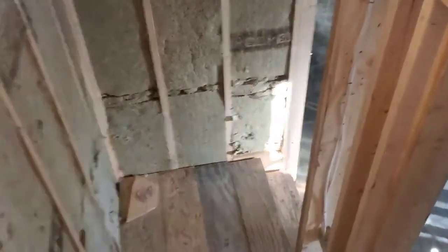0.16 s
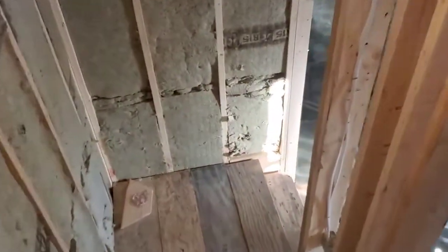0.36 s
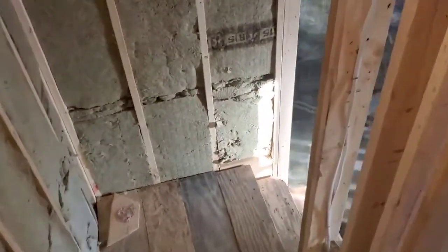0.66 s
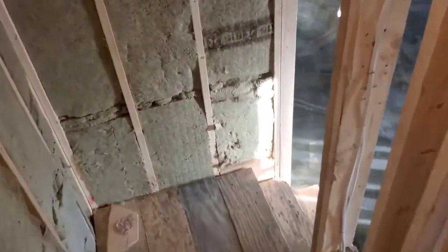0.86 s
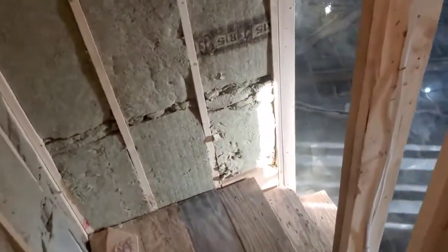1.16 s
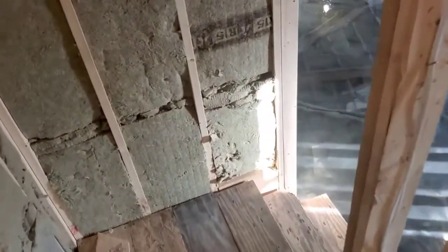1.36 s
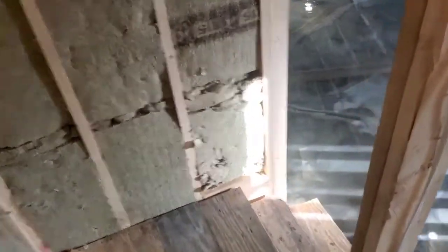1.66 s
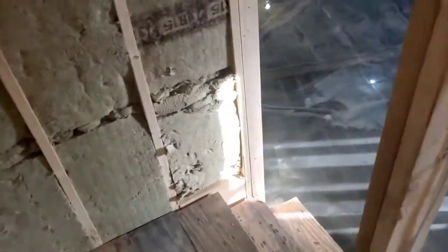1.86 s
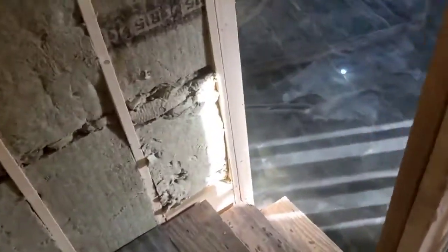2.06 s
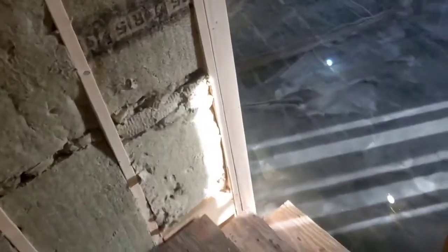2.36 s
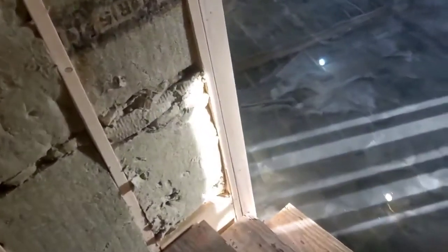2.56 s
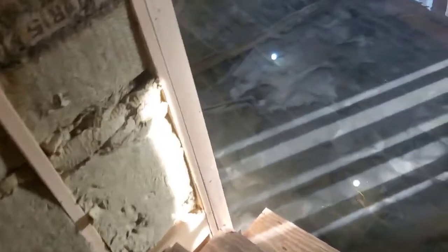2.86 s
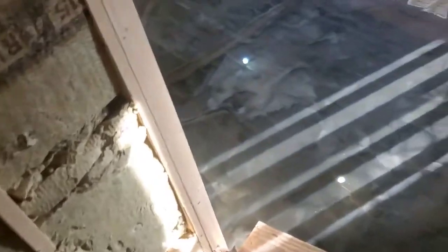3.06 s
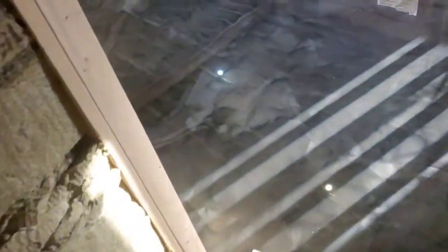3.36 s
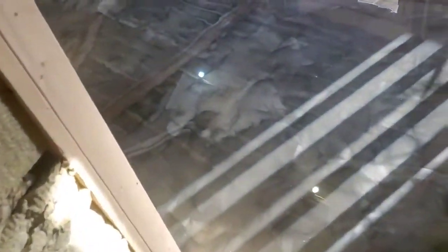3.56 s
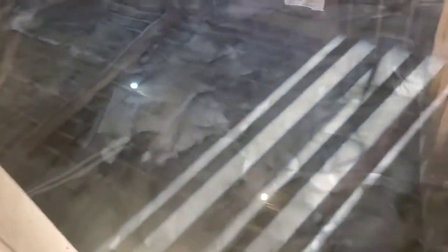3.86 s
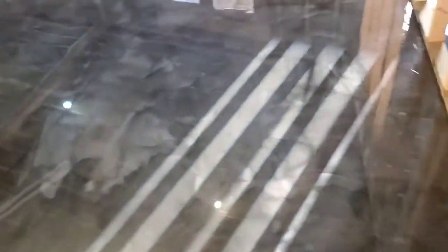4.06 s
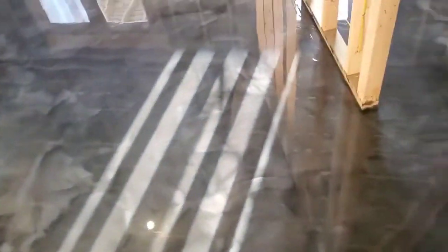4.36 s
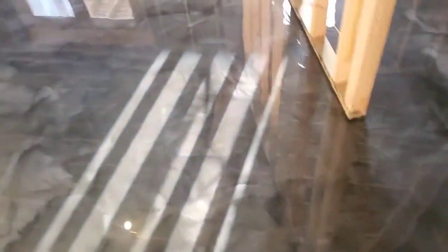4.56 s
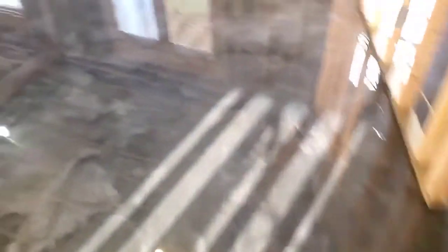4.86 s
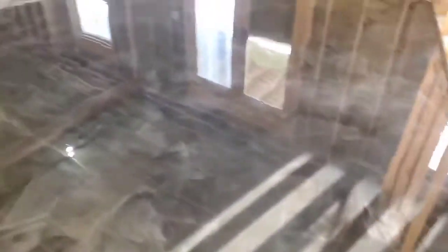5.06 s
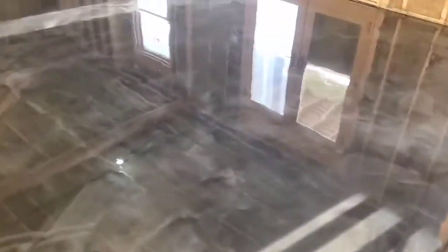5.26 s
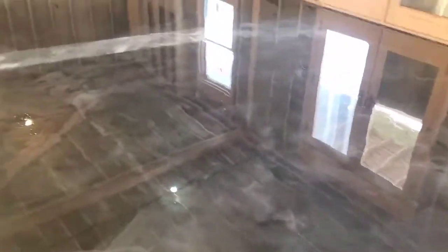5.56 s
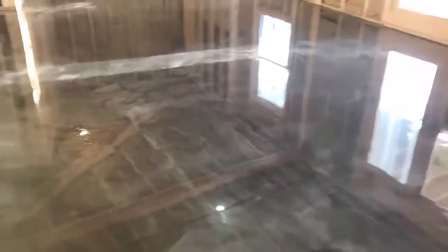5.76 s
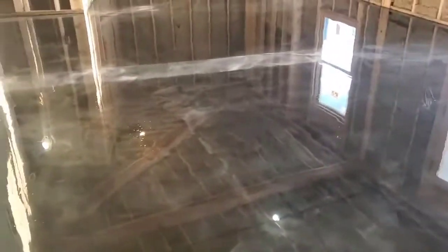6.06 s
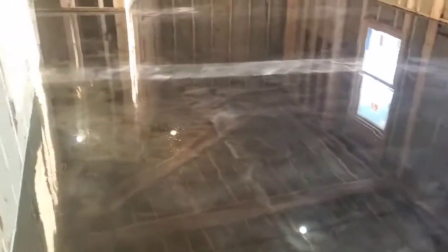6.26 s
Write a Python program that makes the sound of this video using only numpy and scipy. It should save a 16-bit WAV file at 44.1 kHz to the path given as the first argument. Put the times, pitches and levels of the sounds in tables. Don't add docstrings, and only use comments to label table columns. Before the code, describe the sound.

Close footsteps descend rough wooden stairs in an unfinished house. Soles crunch loose grit, clack on tread edges and make planks ring, with low thumps from the framing. The loudest crunchy cluster comes about two and a half seconds in; later steps are duller, and a hard heel lands on the slab at five seconds. Cloth rustles near the handheld stereo microphone, with a short dull room tail and very faint hum.

```python
import sys
import numpy as np
from scipy import signal
from scipy.fft import rfft, irfft, next_fast_len
from scipy.io import wavfile
from scipy.ndimage import uniform_filter1d

SR = 44100
rng = np.random.default_rng(int(sys.argv[2]) if len(sys.argv) > 2 else 0)


def bounce(signal):
    frames = np.transpose(np.atleast_2d(signal))
    limited = np.clip(frames, -1, 1)
    pcm = np.round(limited * 32767).astype(np.int16)
    wavfile.write(sys.argv[1], SR, pcm)


def gain_from_db(level_db):
    decades = np.asarray(level_db, float) / 20
    return 10 ** decades


N = 282681
SIZE = next_fast_len(N + SR)
RISE_SHARE = 0.012

# start_s, peak_db, t60_s, ring_hz
CRACKS = [(0.002, -32.5, 0.044, 1500), (0.849, -26.5, 0.1, 1620), (0.895, -36.5, 0.05, 1930),
          (2.2, -45.5, 0.085, 1000), (2.449, -37, 0.2, 1550), (2.493, -20.5, 0.051, 2130),
          (2.619, -35, 0.044, 2080), (3.078, -34.5, 0.031, 1360), (3.439, -49.5, 0.036, 1750),
          (4.843, -54.5, 0.079, 2030), (4.973, -46.5, 0.032, 1040), (5.179, -50, 0.074, 1710)]
# start_s, peak_db, t60_s, ring_hz
PRESSES = [(0.356, -50.5, 0.17, 1310), (0.441, -35, 0.072, 1350), (0.513, -53.5, 0.44, 1560),
           (0.562, -30, 0.076, 1150), (0.739, -53.5, 0.11, 1260), (0.993, -46, 0.24, 1710),
           (1.484, -46, 0.11, 2040), (2.015, -38.5, 0.049, 1480), (2.459, -33.5, 0.17, 2240),
           (2.476, -30, 0.076, 1620), (2.885, -46, 0.067, 2250), (2.947, -44.5, 0.17, 1780),
           (3.318, -53, 0.31, 2160), (4.115, -52.5, 0.15, 2200), (5.67, -54, 0.25, 1330),
           (5.704, -46, 0.3, 1680)]
# start_s, peak_db, t60_s, ring_hz, relative wood_db
TAPS = [(0.091, -42.5, 0.15, 1300, -3.5), (0.451, -42.5, 0.09, 1350, -26), (0.839, -37, 0.11, 1380, -2),
        (0.945, -36.5, 0.067, 1370, -8), (1.406, -37, 0.12, 1010, -4.5), (1.907, -34.5, 0.11, 1020, -19),
        (1.952, -41, 0.17, 1520, -8), (2.093, -49, 0.13, 1010, 2.5), (2.466, -28, 0.088, 2050, -37),
        (2.505, -28, 0.035, 1130, 1), (2.612, -37.5, 0.1, 1920, -8), (2.912, -38.5, 0.1, 1450, -13),
        (3.143, -47.5, 0.091, 980, -12)]
# start_s, peak_db, t60_s, relative wood_db, relative fizz_db
BUMPS = [(0.275, -69.5, 0.11, 18.5, -24), (0.41, -56.5, 0.23, 5, 0.5), (0.88, -54, 0.057, 8, 2),
         (0.909, -56.5, 0.15, 10, -0.5), (1.435, -49, 0.25, 5, -12.5), (1.887, -49.5, 0.12, 8, -11),
         (2.438, -44, 0.18, 0, -3), (2.86, -52.5, 0.095, 11, -32), (3.482, -48, 0.041, 5, -19),
         (3.507, -48, 0.036, 6, -4), (3.556, -50, 0.06, 4, -18), (3.586, -43.5, 0.04, 0.5, -18),
         (3.624, -43, 0.06, 8.5, -7), (3.661, -51.5, 0.055, 13, -6), (4.24, -79, 0.21, 18.5, -20),
         (4.36, -66.5, 0.021, 20.5, -15), (5.025, -49.5, 0.13, 15, -40)]


def contacts():
    cracks = [(s, db, -13, -13.5, t60, hz) for s, db, t60, hz in CRACKS]
    presses = [(s, db, -4, -14, t60, hz) for s, db, t60, hz in PRESSES]
    taps = [(s, db, wood_db, -31, t60, hz) for s, db, t60, hz, wood_db in TAPS]
    bumps = [(s, db, wood_db, fizz_db, t60, 1350) for s, db, t60, wood_db, fizz_db in BUMPS]
    return cracks + presses + taps + bumps


# pitch_hz, level_db per Hz
CRUNCH = [(290, -36.5), (500, -9), (612, 1), (757, -7.5), (1020, -9), (1160, -4.5), (1600, -7), (1820, -6),
          (2080, -3.5), (3030, -18.5), (5000, -37), (6500, -69), (11000, -120)]


def crunch():
    out, stones = np.zeros((2, N)), colour(grit(1800, 2.2, 0.6), CRUNCH)
    for s, db, _, _, t60, hz in contacts():
        shape = swell(0.72 * RISE_SHARE * t60, t60)[1]
        burst = stones[:, round(s * SR):][:, :len(shape)]
        burst = burst * shape[:burst.shape[1]]
        ring = min(1, (1500 / hz) ** 2) * resonate(burst, hz, 230)
        add(out, s, gain_from_db(db - 9.5) * (burst + 1.55 * ring))
    return out


# pitch_hz, width_hz, level_db
WOOD = [(179, 190, -4.5), (284, 98, 0), (385, 51, 0), (452, 100, -1.5), (595, 87, -4), (765, 61, -10)]


def plank():
    effort = np.zeros(N)
    for s, db, wood_db, _, t60, _ in contacts():
        add(effort, s, gain_from_db(db + wood_db + 0.5) * swell(RISE_SHARE * t60, 1.59 * t60)[1])
    shake = grit(700, 3.6, 0.66) * effort
    out = np.zeros((2, N))
    for k, (hz, width, db) in enumerate(WOOD):
        out += (-1) ** k * gain_from_db(db) * resonate(shake, hz, width)
    return gain_from_db(13.0) * out


# pitch_hz, level_db per Hz
FIZZ = [(1760, 4), (3000, 5.5), (3750, 2), (3890, 2.5), (6040, 0), (7100, 1), (9070, -12.5), (10400, -5),
        (14300, -2), (15200, 0), (16000, -7)]


def fizz():
    effort = np.zeros(N)
    for s, db, _, fizz_db, t60, _ in contacts():
        add(effort, s, gain_from_db(db + fizz_db - 1.0) * swell(2.16 * RISE_SHARE * t60, 1.09 * t60)[1])
    bright = colour(grit(6000, 3.2, .9) * effort, FIZZ)
    dull = signal.sosfilt(signal.butter(4, 11800, fs=SR, output="sos"), bright)
    last_treads_s = 3.4
    return np.where(np.arange(N) < last_treads_s * SR, bright, dull)


# start_s, peak_db, ring_hz
SAND = [(0.3677, -56, 10100), (0.4278, -49, 12550), (0.4388, -39, 13440), (0.443, -55, 12900),
        (0.448, -40, 12730), (0.5625, -45, 13500), (0.8513, -39, 12700), (0.8817, -38, 13000),
        (0.8884, -47, 13050), (0.8971, -40, 12900), (0.9093, -54, 11800), (1.4088, -55.5, 12100),
        (1.8978, -56, 12600), (1.9095, -42, 14100), (1.927, -54, 12730), (1.9961, -50, 13140),
        (2.0013, -51, 13180), (2.0418, -47, 12620), (2.4411, -47, 13290), (2.45, -34, 15070),
        (2.4598, -29, 15000), (2.4681, -30, 14100), (2.4756, -28, 14900), (2.4926, -40, 13950),
        (2.5029, -35, 14100), (2.5251, -56, 9630), (2.6185, -36.5, 14560), (2.8877, -54, 13500),
        (2.9252, -56, 13180), (2.9489, -43, 15330), (2.9765, -50, 14250), (3.079, -45, 12210),
        (3.1074, -61, 12360), (3.3229, -55, 13760), (3.4408, -55, 13980), (3.5089, -51, 13100),
        (3.6261, -54, 11370), (3.6645, -55, 10060), (4.136, -52, 14450), (4.1686, -58, 12020),
        (4.8466, -59, 10210), (4.9729, -52, 12020)]
# start_s, peak_db, ring_hz
STONES = [(0.5665, -40, 3260), (0.575, -43, 3210), (0.8503, -47, 3010), (0.8809, -50, 6720),
          (0.8965, -53, 6600), (0.9096, -54, 4540), (0.9707, -55, 6850), (1.4112, -55, 3270),
          (1.909, -50, 6800), (2.0176, -59, 6870), (2.4497, -46, 4390), (2.4625, -37, 6700),
          (2.514, -40, 3320), (2.6188, -45.5, 7600), (2.8895, -54, 3010), (2.9053, -55, 4390),
          (2.9504, -56, 7580), (2.9773, -51, 3080), (3.08, -47, 3680), (3.4815, -68, 3190),
          (3.5089, -47, 5700), (3.5593, -59, 3980), (3.5719, -63, 3900), (3.6279, -50, 6000),
          (3.6651, -51.5, 3170), (4.1197, -58, 3810), (4.9729, -57, 4730), (5.177, -64, 7040)]
# start_s, peak_db, ring_hz
CLACKS = [(0.0157, -52, 820), (0.0989, -42, 1240), (0.4452, -37, 1460), (0.4508, -29.5, 1310),
          (0.4571, -48, 1310), (0.4671, -39, 1380), (0.5137, -52, 820), (0.5665, -44, 1210),
          (0.5771, -35, 2000), (0.8404, -40, 1390), (0.8501, -20.5, 1400), (0.854, -23, 1480),
          (0.884, -49, 1490), (0.8972, -32, 2000), (0.9493, -49, 1340), (1.4071, -41, 1070),
          (1.4379, -41.5, 1260), (1.444, -45, 870), (1.9102, -33.5, 1600), (1.9181, -41, 1710),
          (1.9561, -42, 1420), (2.0175, -38, 1510), (2.4602, -36, 830), (2.4685, -32, 1990),
          (2.4787, -29, 1550), (2.4991, -22, 1600), (2.5057, -20.5, 2000), (2.5152, -29.5, 1220),
          (2.5279, -44, 1380), (2.6158, -36, 2020), (2.6207, -29.5, 2040), (2.6298, -38, 1310),
          (2.9177, -41, 1580), (2.9461, -47, 1810), (2.9602, -45, 1380), (3.0796, -43.5, 1540),
          (3.1464, -49, 1020), (3.4411, -49.5, 2300), (3.4821, -48, 1320), (3.6259, -37.5, 1790),
          (5.7129, -45, 1560), (5.7413, -47, 1770)]
# start_s, peak_db, ring_hz
ROLLS = [(0.094, -40, 696), (0.86, -23.5, 614), (0.869, -29, 600), (0.911, -33, 600), (1.028, -45, 580),
         (1.41, -38, 1290), (1.487, -44, 614), (1.964, -40, 568), (2.023, -46, 1980), (2.446, -39, 538),
         (2.453, -30, 584), (2.4695, -22.5, 653), (2.494, -17, 2100), (2.509, -26, 595), (2.519, -36, 659),
         (2.863, -54, 533), (2.888, -45, 517), (2.924, -47, 528), (2.979, -38, 1320), (3.557, -47, 1380),
         (3.586, -42, 573), (3.633, -45, 719), (5.028, -47, 536), (5.0322, -31.5, 430), (5.059, -41, 519),
         (5.672, -52, 657), (5.789, -47, 1810), (5.829, -45, 1780), (0.879, -30, 620), (0.8845, -34, 640),
         (0.9545, -33, 1700), (3.538, -47, 1500)]


def snaps():
    out = np.zeros((2, N))
    sides = np.array([[1], [-0.3]])
    lead_s = .0005
    # events, t60 s, resonance width Hz, gain dB
    kinds = [(SAND, 0.024, 3100, 3.7), (STONES, 0.011, 750, 2.5),
             (CLACKS, .005, 243, 4.4), (ROLLS, .008, 330, -4.2)]
    for rows, t60, width, gain_db in kinds:
        shape = swell(.0003, t60)[1][:2000]
        click = 8.6 * (np.arange(len(shape)) == 0)
        for s, db, hz in rows:
            burst = rng.standard_normal((2, len(shape))) * shape + click
            ring = resonate(resonate(burst, hz, width), hz, 3.1 * width)
            ring = ring / np.abs(ring).max(axis=1, keepdims=True)
            add(out, s - lead_s, gain_from_db(db + gain_db) * sides * ring)
    return out


# start_s, peak_db, pitch_hz, t60_s
HEELS = [(5.0287, -19.5, 282, 0.018), (5.036, -42, 419, 0.094), (5.04, -43.5, 631, 0.068),
         (5.027, -51.5, 910, 0.02), (5.04, -57, 1970, 0.037), (5.051, -53, 1284, 0.05),
         (5.085, -53.5, 833, 0.05), (5.703, -39.5, 292.6, 0.16), (1.862, -47.5, 280, 0.087),
         (2.072, -41, 375, 0.034), (2.115, -44.5, 350, 0.029), (3.325, -61.5, 332, 0.14),
         (3.37, -62, 306, 0.092), (3.6205, -39, 380, 0.016), (3.479, -50, 503, 0.039),
         (5.048, -36.5, 258, 0.037), (6.02, -63, 243, 0.075)]
# start_s, peak_db, pitch_hz, t60_s
THUMPS = [(0.099, -48, 73.5, 0.22), (0.407, -50, 103, 0.083), (0.591, -47.5, 108.8, 0.22),
          (0.854, -33, 73.5, 0.31), (0.909, -34.5, 103, 0.15), (1.025, -43.5, 134.3, 0.43),
          (1.392, -47, 112, 0.15), (1.451, -49, 139, 0.11), (1.938, -44.5, 108, 0.1),
          (2.083, -35.5, 119, 0.073), (2.122, -33, 106, 0.1), (2.169, -51.5, 116.4, 0.41),
          (2.49, -43, 104.2, 0.31), (2.553, -33.5, 104.5, 0.2), (2.639, -49, 120, 0.31),
          (3.653, -28, 90.3, 0.22), (3.719, -53, 85, 0.28), (4.145, -35, 90.2, 0.19),
          (4.188, -44, 94, 0.024), (5.025, -34.5, 117, 0.1), (5.186, -44, 68.6, 0.36)]
# start_s, peak_db, pitch_hz, t60_s
KNOCKS = [
    (1.024, -52, 147, 0.2),
    (4.948, -43.5, 209, 0.11),
    (4.968, -44, 161, 0.14),
    (5.043, -30, 149.6, 0.12),
    (5.701, -38, 143, 0.26),
    (5.708, -41, 158, 0.1),
    (5.738, -31, 150, 0.041),
    (5.79, -47, 161.7, 0.22),
    (5.86, -50.5, 147, 0.14),
    (6.148, -61.5, 233, 0.16),
]
# start_s, peak_db, pitch_hz, t60_s
SAGS = [(0.004, -43, 44.5, 0.22), (0.86, -36.5, 71.3, 0.35), (1.008, -40, 34.2, 0.54),
        (1.091, -54, 36, 0.26), (1.49, -41, 52.5, 0.39), (2.025, -43.5, 36.6, 0.57),
        (2.47, -42, 31.5, 0.57), (2.58, -38, 31.3, 0.27), (2.689, -50, 40.8, 0.51), (2.779, -46, 34.1, 1),
        (2.86, -44.5, 67.3, 0.18), (2.997, -46.5, 33.8, 0.85), (3.128, -50, 63.3, 0.38),
        (3.501, -37, 43, 0.074), (3.523, -30, 41.5, 0.39), (4.067, -43.5, 54.4, 0.36),
        (4.349, -50, 52, 0.15), (5.183, -32.5, 41.25, 0.65), (5.718, -38, 41.4, 0.23),
        (5.769, -44, 57, 0.32)]


def thuds():
    out = np.zeros(N)
    for rows, rise_s in (HEELS, 0.0062), (THUMPS, 0.0043), (KNOCKS, 0.0017), (SAGS, 0.0038):
        for s, db, hz, t60 in rows:
            t, shape = swell(rise_s, t60)
            mode = np.sin(2 * np.pi * hz * t)
            neighbour = 0.19 * np.sin(2 * np.pi * 1.38 * hz * t)
            add(out, s, gain_from_db(db) * shape * (mode + neighbour))
    return out * [[1], [1]]


# start_s, length_s, scrape_db, hiss_db
DRAGS = [
    (0.336, 0.1, -67, -68),
    (0.963, 0.094, -59.5, -62),
    (3.548, 0.055, -53.5, -75),
    (1.965, 0.093, -56, -55.5),
    (2.88, 0.092, -58, -84),
    (3.616, 0.075, -59, -72),
    (5.664, 0.094, -64, -61),
    (5.733, 0.092, -58, -58.5),
    (5.8, 0.062, -58.5, -65),
]


def drags():
    t = np.arange(N) / SR
    scrape, hiss = np.zeros((2, N))
    for start, length, scrape_db, hiss_db in DRAGS:
        pressed = np.clip(np.minimum((t - start) / 0.027, (start + length - t) / 0.033), 0, 1)
        scrape += gain_from_db(scrape_db) * pressed
        hiss += gain_from_db(hiss_db) * pressed
    return scrape, hiss


# start_s, peak_db, fade_db per s
BRUSHES = [
    (0.0, -44.5, 255),
    (0.21, -63.5, 55),
    (0.52, -58, 72),
    (1.57, -65, 23),
    (2.48, -68.5, 2),
    (3.05, -67.5, 63.5),
    (3.63, -59.5, 99),
    (5.05, -64.5, 41),
    (5.84, -68.5, 26),
]
# pitch_hz, level_db per Hz
SCRAPE = [(150, -33.5), (260, -2.5), (626, 0.5), (930, -6), (1040, -1), (1130, -6), (1450, -4.5),
          (1930, -1.5), (2530, -15), (3810, -16.5), (5000, -19.5), (6500, -40), (11000, -120)]


def scrape():
    rest_db = -66.5 - 1.87 * np.arange(N) / SR
    effort = efforts(BRUSHES, 65, rest_db) + drags()[0]
    return colour(grit(3000, 0.86, 1.13) * effort * gain_from_db(4.87 * drift(38)), SCRAPE)


# start_s, peak_db, fade_db per s
SWINGS = [(0.0, -63, 32), (0.52, -64, 35), (1.03, -59, 50), (1.57, -63, 67), (2.05, -64, 34),
          (2.62, -64, 83), (3.05, -60, 48), (3.62, -71, 18), (4.39, -64, 40), (5.2, -61, 59),
          (6.02, -75, 73)]
# pitch_hz, level_db per Hz
RUSTLE = [(1470, -9), (2500, 0.5), (3260, -11.5), (4140, -5.5), (4650, -9.5), (5560, -4), (7190, -4.5),
          (9440, -13.5), (12300, -1.5), (15200, -9.5), (16000, -8)]


def rustle():
    effort = efforts(SWINGS, 80, -86) + drags()[1]
    bright = colour(grit(6000, 2.9, 1.0) * effort * gain_from_db(2.9 * drift(30)), RUSTLE)
    dull = signal.sosfilt(signal.butter(6, 13500, fs=SR, output="sos"), bright)
    slab_s = DRAGS[-3][0]
    return np.where(np.arange(N) / SR < slab_s, bright, dull)


# start_s, framing rumble_db, tread shudder_db, fade_db per s
SHIFTS = [(0.0, -38, -51, 53), (0.4, -54, -55, 21), (0.66, -52, -56.5, 57), (1.03, -42.5, -53, 53),
          (1.23, -64, -73, 16), (1.57, -45, -64, 43.5), (2.11, -48, -61, 34), (2.48, -47, -58, 18),
          (3.05, -50.5, -69, 56), (3.5, -53, -73, 9), (3.62, -54, -55, 66), (3.68, -41.5, -54, 47),
          (4.02, -49.5, -68.5, 30), (4.21, -65, -65.5, 34), (5.21, -44.5, -56, 123), (5.48, -53, -80, 26),
          (6.05, -53, -70.5, 25)]
# pitch_hz, level_db per Hz
RUMBLE = [(14, -24), (28, -4.5), (42, -2), (60, -3), (85, -13), (110, -34.5), (200, -71.5)]
# pitch_hz, level_db per Hz
CREAK = [(50, -42.5), (85, 1.5), (110, 2), (150, -4.5), (220, -7), (290, -31), (500, -62)]


def structure():
    rise, faster = 46.6, 2.43
    rumble = efforts([(s, db, fade) for s, db, _, fade in SHIFTS], rise, -69)
    shudder = efforts([(s, db, faster * fade) for s, _, db, fade in SHIFTS], faster * rise, -78.5)
    rumble = colour(rng.standard_normal((2, N)), RUMBLE) * rumble * gain_from_db(-5.5 + 2.0 * drift(30))
    shudder = colour(rng.standard_normal((2, N)), CREAK) * shudder * gain_from_db(2.5 + 5.7 * drift(18))
    return rumble + shudder


def room(x):
    t60_s, level_db = 0.25, -16.5
    t = np.arange(int(.6 * SR)) / SR
    tail = rng.standard_normal((2, len(t))) * gain_from_db(-60 * t / t60_s) * (t > .006)
    tail = signal.sosfilt(signal.butter(1, [380, 2400], "band", fs=SR, output="sos"), tail)
    return gain_from_db(level_db) * signal.fftconvolve(x, rms_one(tail) / np.sqrt(len(t)), axes=1)[:, :N]


# pitch_hz, level_db per Hz
HUSH = [(130, -46), (220, -14), (326, 2.5), (403, -11), (900, -15), (1840, -3), (3190, -21.5),
        (5350, -22.5), (7380, -15), (9300, -25.5), (10500, -15), (11700, -16.5), (12600, -14.5),
        (14500, -21), (15600, -72)]


def hush():
    waver_db = 1.4 * drift(3.153)
    return gain_from_db(-72 + waver_db) * colour(rng.standard_normal((2, N)), HUSH)


def sway():
    band = signal.butter(2, [5, 14], "band", fs=SR, output="sos")
    slow = signal.sosfilt(band, rng.standard_normal(N + SR))
    return gain_from_db(-53.5 + 1.0 * drift(7.8)) * rms_one(slow[SR:])


# pitch_hz, left-right likeness (-1 to 1)
LIKENESS = [(60, .99), (150, .97), (350, .85), (650, 0.58), (1000, 0.11), (1800, -0.23), (4500, -0.03),
            (6500, 0.35), (8500, .99), (11000, 0.5), (15000, 0.05)]
# pitch_hz, level_db
SHADING = [(60, 0.5), (110, -1), (200, -2), (380, -2.5), (700, -1), (1290, -5.5), (2380, -2), (4400, -1),
           (8120, -4), (15000, -7.5)]
# pitch_hz, lag_radians
LEFT_LAG = [(120, 0), (350, .12), (690, .45), (1030, 2.1), (1700, 3.3), (3500, 5.0), (6000, 6.28)]


def ports(pair):
    alike, shade = np.clip(at_hz(LIKENESS), -.99, .99), at_hz(SHADING)
    common, opposed = rfft(pair, SIZE)
    common, opposed = common * np.sqrt(1 + alike), opposed * np.sqrt(1 - alike)
    left = (common + opposed) * gain_from_db(shade / 2) * np.exp(-1j * at_hz(LEFT_LAG))
    right = (common - opposed) * gain_from_db(-shade / 2)
    return irfft(np.array([left, right]), SIZE)[:, :N] / np.sqrt(2)


def rms_one(x):
    return x / np.sqrt(np.mean(x ** 2) + 1e-20)


def at_hz(points):
    hz, value = np.transpose(points)
    return np.interp(np.log(np.arange(SIZE // 2 + 1) * SR / SIZE + 1), np.log(hz), value)


def colour(x, spectrum):
    cepstrum = irfft(at_hz(spectrum) * np.log(10) / 20, SIZE)
    cepstrum[1:SIZE // 2] *= 2
    cepstrum[SIZE // 2 + 1:] = 0
    response = np.exp(rfft(cepstrum))
    response = response / np.sqrt(np.mean(np.abs(response) ** 2))
    return irfft(rfft(x, SIZE) * response, SIZE)[..., :N]


def resonate(x, hz, width):
    r = np.exp(-np.pi * max(width, 30) / SR)
    return signal.lfilter([1 - r, 0, r - 1], [1, -2 * r * np.cos(2 * np.pi * hz / SR), r * r], x + 1e-18)


def drift(rate):
    knots = rng.standard_normal(int(N / SR * 40) + 2)
    return np.interp(np.arange(N) / SR * min(rate, 39), np.arange(len(knots)), knots)


def grit(per_s, spread_db, smooth):
    sizes = gain_from_db(spread_db * np.minimum(rng.exponential(1, N), 4))
    sizes = sizes * (rng.random(N) < per_s / SR)
    grains = rms_one(sizes * rng.choice([-1, 1], (2, N)))
    return rms_one(grains + smooth * rng.standard_normal((2, N)))


def swell(rise_s, t60):
    t = np.arange(int(.7 * SR)) / SR
    shape = (1 - np.exp(-t / max(rise_s, 1e-4))) ** 2 * gain_from_db(-60 * t / max(t60, .01))
    return t, shape / shape.max()


def efforts(rows, rise, rest_db):
    t, out = np.arange(N) / SR, rest_db
    for s, db, fade in rows:
        out = np.maximum(out, db - np.where(t < s, rise * (s - t), fade * (t - s)))
    return gain_from_db(out)


def add(track, s, piece):
    at = max(round(s * SR), 0)
    track[..., at:at + piece.shape[-1]] += piece[..., :N - at]


def scene():
    feet = crunch() + plank() + fizz() + thuds()
    motion = scrape() + rustle() + structure()
    return ports(feet + snaps() + motion + room(feet) + hush()) + sway()


def gate_top(x):
    from_hz, floor_db, db_per_khz, chance_db = 8000, -108, 1.9, 3.2
    hz, _, cells = signal.stft(x, SR, nperseg=1024, noverlap=768)
    hz = hz[:, None]

    def blur(grid, frames):
        return uniform_filter1d(uniform_filter1d(grid, size=3, axis=0), size=frames, axis=1)

    power = blur(np.mean(np.abs(cells) ** 2, axis=0), 8)
    chance = rms_one(blur(rng.standard_normal(power.shape), 14))
    least_db = floor_db + db_per_khz * (hz - from_hz) / 1000
    kept = (10 * np.log10(power + 1e-18) + chance_db * chance > least_db) | (hz < from_hz)
    return signal.istft(cells * kept, SR, nperseg=1024, noverlap=768)[1][:, :N]


def low_pass(x):
    return signal.sosfilt(signal.butter(12, 16300, fs=SR, output="sos"), x)


def record(dry):
    dry = signal.sosfilt(signal.butter(2, 4, "high", fs=SR, output="sos"), dry)
    dry = signal.sosfilt(signal.cheby2(12, 60, 16350, fs=SR, output="sos"), dry)
    return low_pass(gate_top(dry))


dry = scene()
out = record(dry)
bounce(out)
```